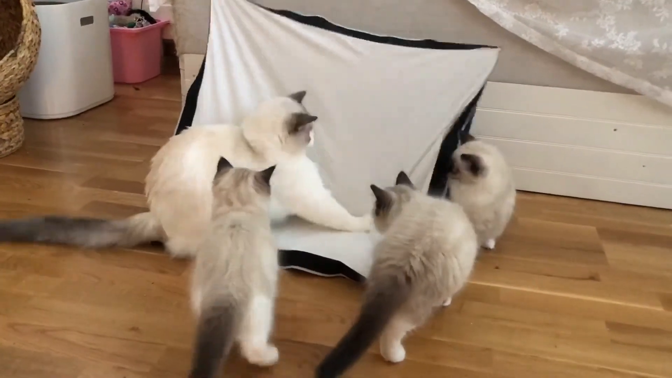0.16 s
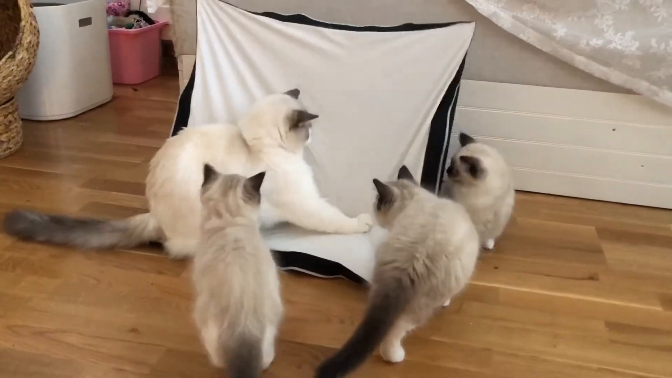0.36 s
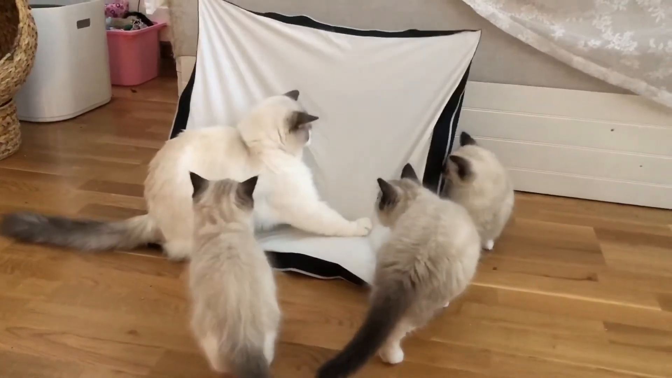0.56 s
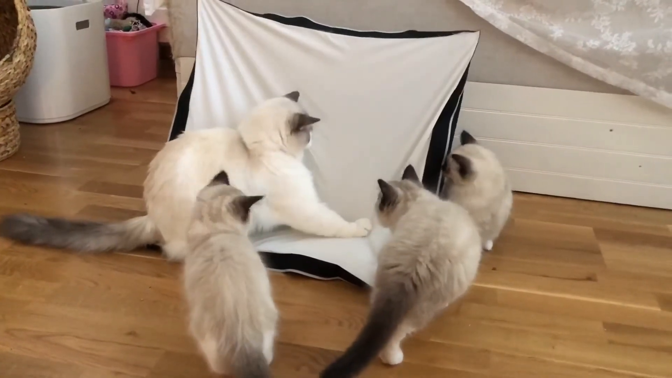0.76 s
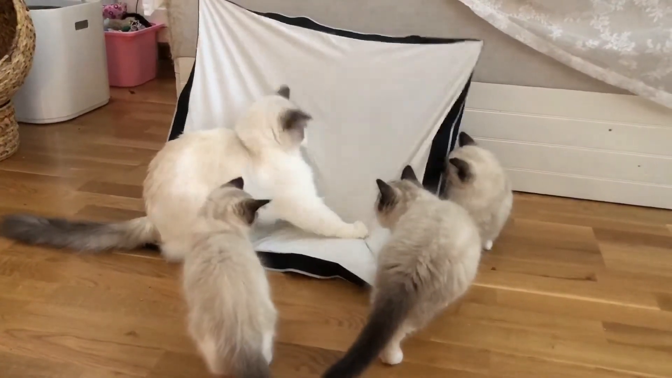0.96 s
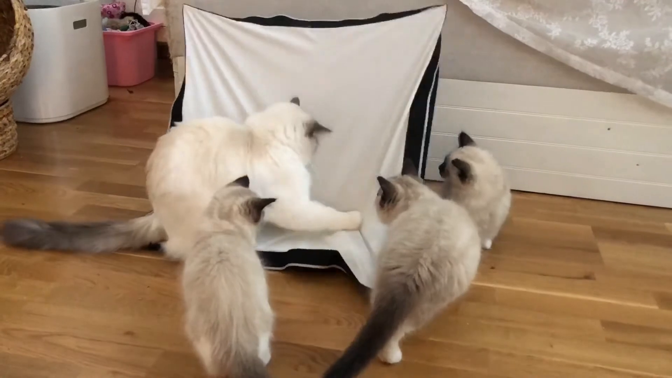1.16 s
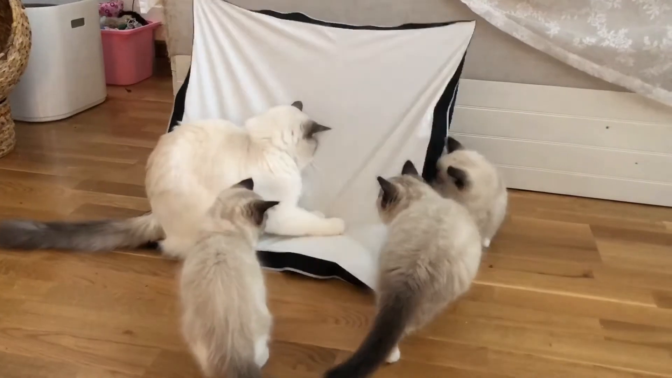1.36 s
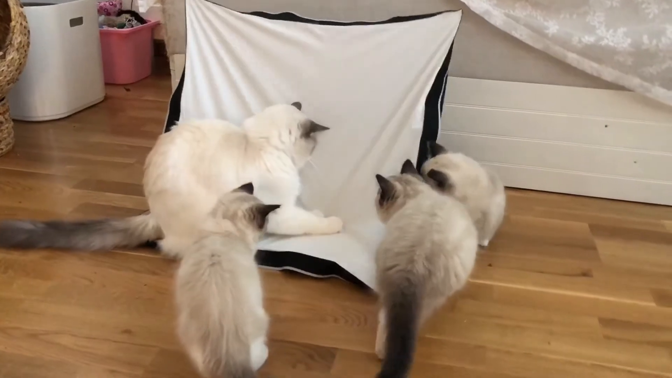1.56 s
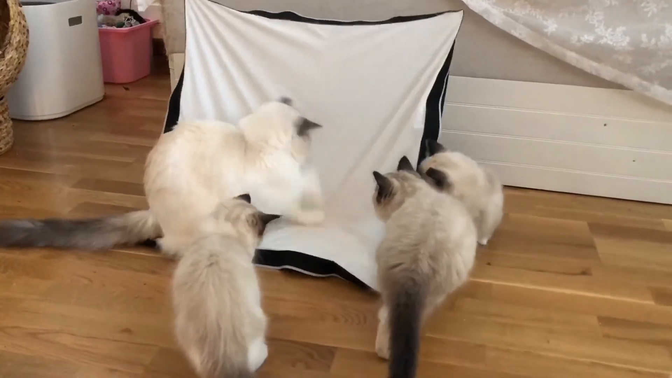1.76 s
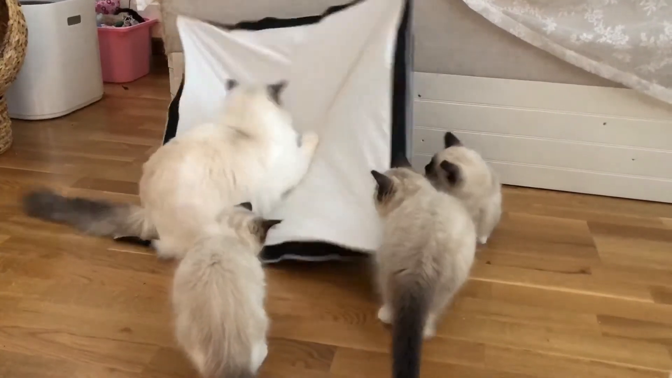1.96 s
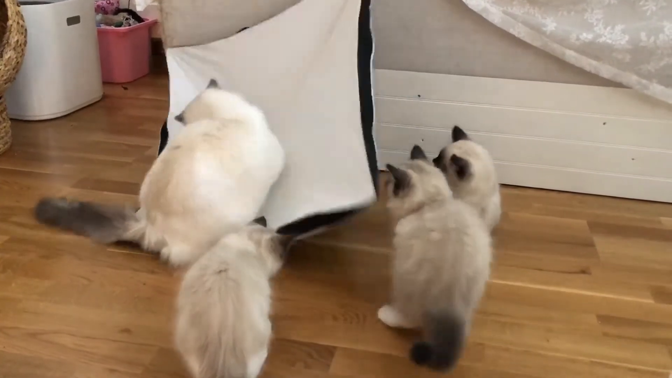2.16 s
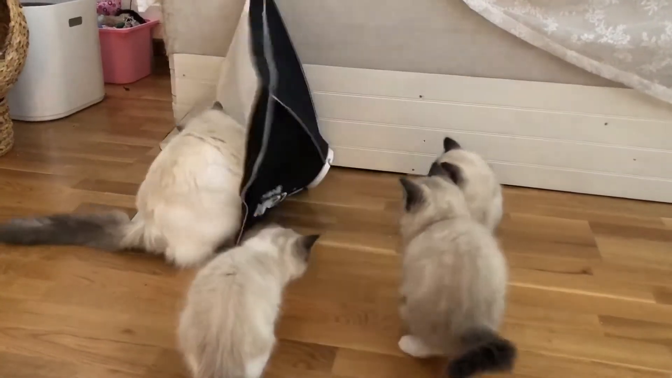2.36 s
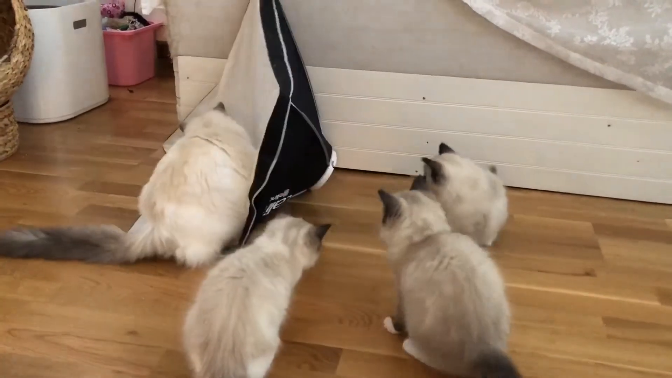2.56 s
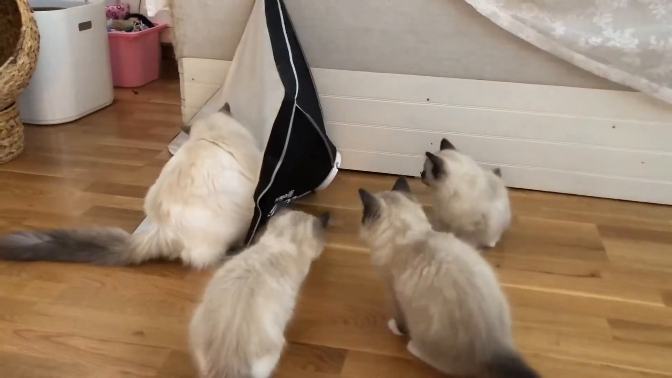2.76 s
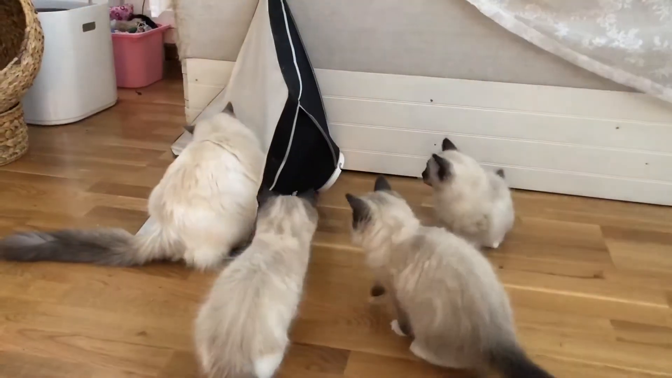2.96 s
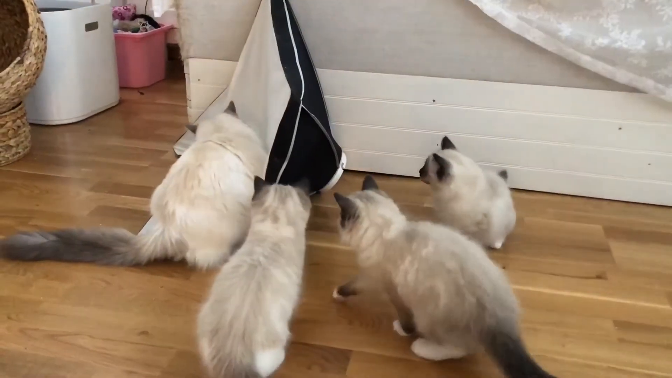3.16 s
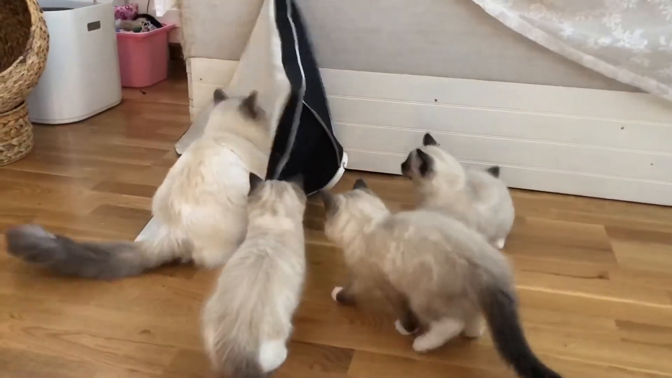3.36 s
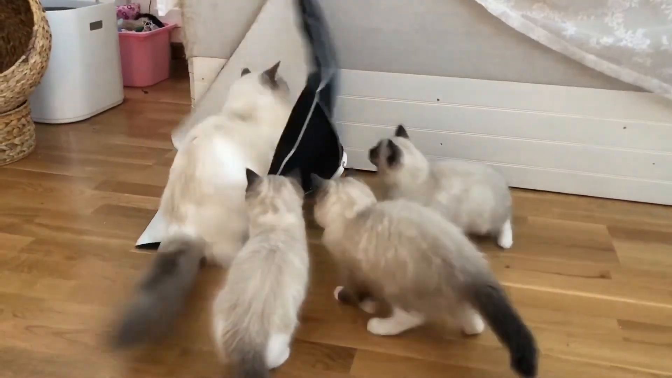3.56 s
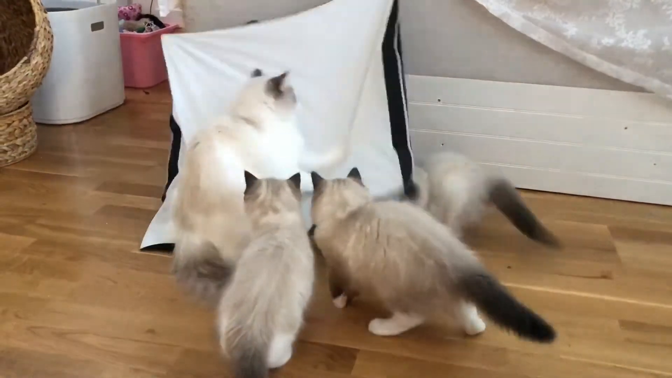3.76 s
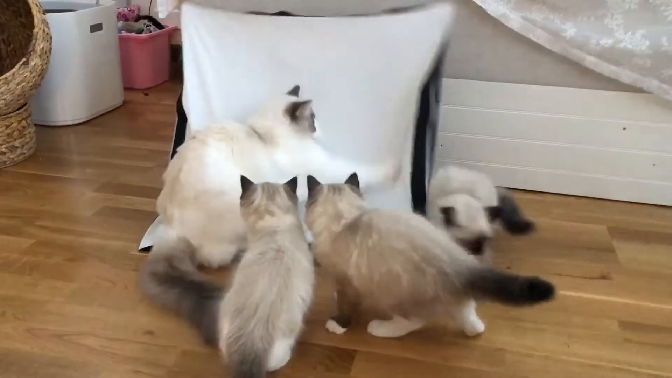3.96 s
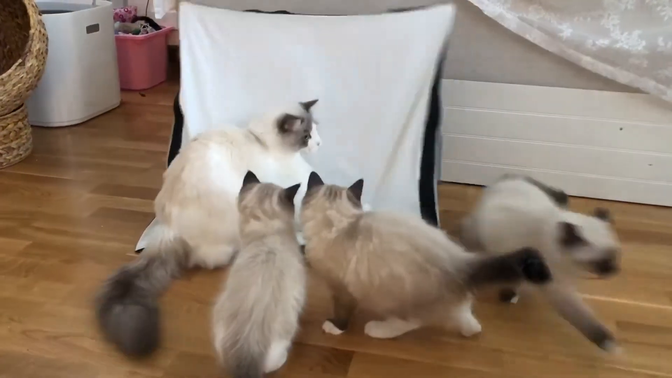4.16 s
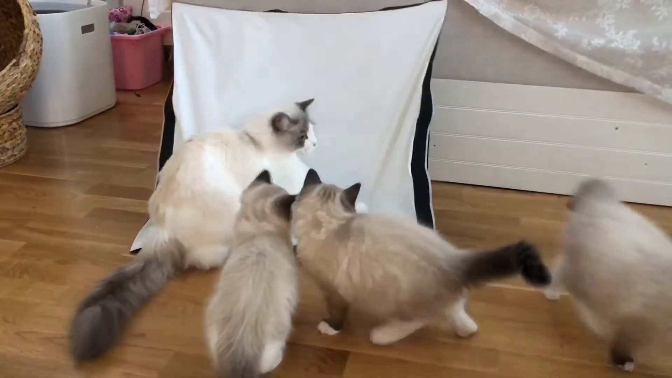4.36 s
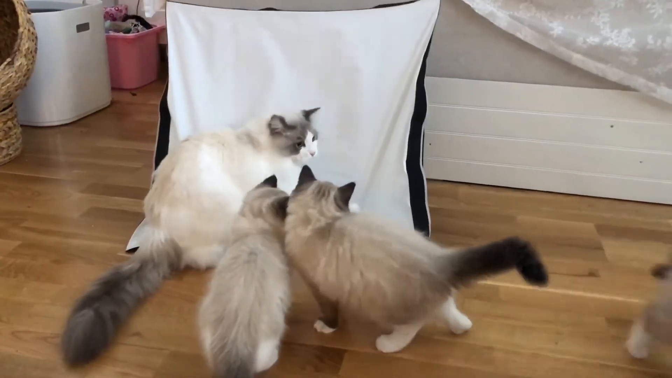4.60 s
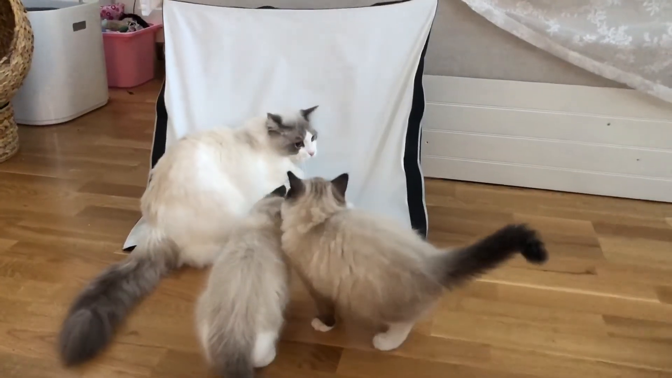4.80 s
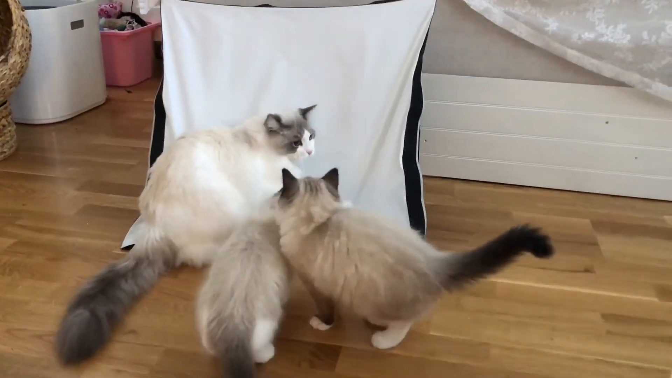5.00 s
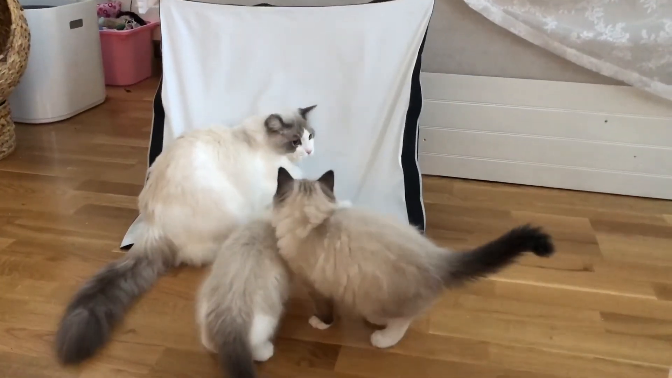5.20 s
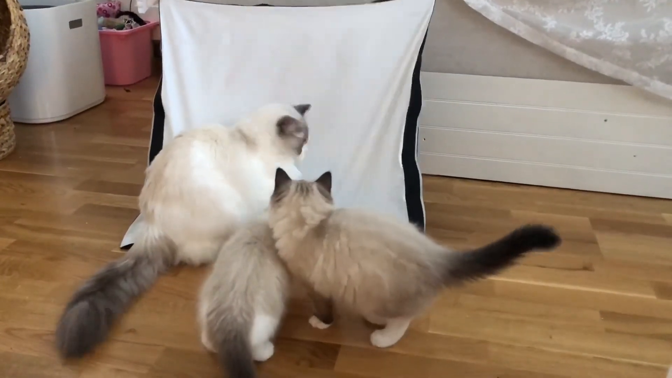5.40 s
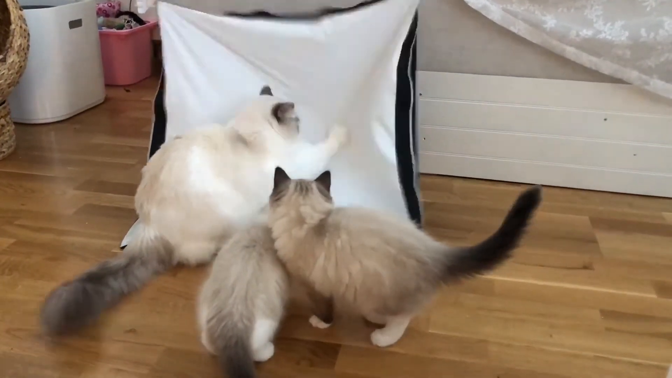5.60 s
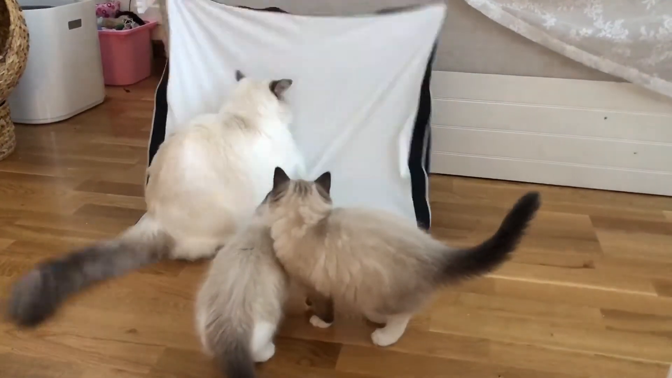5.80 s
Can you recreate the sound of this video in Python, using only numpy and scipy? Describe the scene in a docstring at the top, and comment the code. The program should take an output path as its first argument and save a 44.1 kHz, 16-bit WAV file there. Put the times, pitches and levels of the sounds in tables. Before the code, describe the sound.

Kittens pounce on a fabric sheet indoors, making bursts of rustling, soft thumps and claw snags over a faint low appliance hum.

```python
"""A low appliance hum in a small room, and almost at once the rustle of a fabric sheet that kittens pounce on.
The sheet is jerked about above a wooden floor: grains and tiny chirps make the cloth billow, crumple and slide.
Noise puffs are its flaps when pulled taut, and short bright noise bursts are claws snagging in it.
Gliding tones zip where a claw runs over the weave; swings of a few cycles are claws and paws on the boards.
One microphone feeds both channels."""
import sys
import numpy as np
from scipy import signal
from scipy.fft import rfft, irfft, next_fast_len
from scipy.io import wavfile
from scipy.ndimage import map_coordinates

SR = 44100
rng = np.random.default_rng(int(sys.argv[2]) if len(sys.argv) > 2 else 0)


def generate_wav(signal):
    """Clip the signal to [-1, 1] and save it as 16-bit WAV at the path in sys.argv[1]."""
    frames = np.transpose(np.atleast_2d(signal))
    scaled = np.clip(frames, -1, 1) * 32767
    pcm = np.round(scaled).astype(np.int16)
    wavfile.write(sys.argv[1], SR, pcm)


N = 257544
TIME = np.arange(N) / SR
CUTOFF_HZ = 15900   # nothing much is heard above this


def from_db(db):
    """Decibels to amplitude gain."""
    return 10 ** (np.asarray(db) / 20)


def rms_one(x):
    """Scale to rms 1."""
    return x / np.sqrt(np.mean(x ** 2) + 1e-20)


def at_hz(points, hz):
    """Read a table of (Hz, value) on a log-frequency axis."""
    table_hz, value = np.transpose(points)
    return np.interp(np.log(np.maximum(hz, 1)), np.log(table_hz), value)


def band(x, edges_hz, kind, order=2):
    """Butterworth filter, with its edges kept inside the usable range."""
    edges_hz = np.clip(edges_hz, 10, SR / 2 - 1000)
    sos = signal.butter(order, edges_hz, kind, fs=SR, output="sos")
    return signal.sosfilt(sos, x + 1e-18)


def coloured(x, spectrum):
    """Weight a signal's spectrum by a table of (Hz, dB); rms 1."""
    size = next_fast_len(len(x), True)
    weight = from_db(at_hz(spectrum, np.fft.rfftfreq(size, 1 / SR)))
    return rms_one(irfft(rfft(x, size) * weight, size)[:len(x)])


def drift(rate):
    """A smooth curve through this many random points per second; rms 1."""
    knots = rng.standard_normal(8000)
    return rms_one(map_coordinates(knots, [TIME * rate], order=3, mode="wrap"))


def burst(t60, rise):
    """A quarter-second envelope that rises and dies away; both times in seconds."""
    age = TIME[:SR // 4]
    return (1 - np.exp(-age / rise)) * np.exp(-np.log(1000) * age / t60)


def add(out, s, sound):
    """Lay a short sound into a track at time s."""
    start = int(np.clip(s * SR, 0, N - 1))
    out[start:start + len(sound)] += sound[:N - start]


# Colour of the still room. Each row: frequency in Hz, relative level in dB per Hz.
HUSH_SPECTRUM = [(15, -30), (25, -16), (66, -12.5), (102, -3), (126, -12), (157, -14), (299, -17.5),
                 (392, -24), (637, -28.5), (905, -26.5), (1360, -34.5), (1730, -36), (2810, -42),
                 (14600, -50.5), (15800, -57)]
# Appliance motor at the microphone. Each row: time in seconds, rms level in dB before it wavers.
MOTOR_LEVEL = [(0, -54), (0.9, -53), (1.7, -53.5), (3.1, -53), (4.1, -54.5), (4.6, -55.5), (5.84, -57.5)]
MOTOR_HZ, MOTOR_WAVER_HZ, MOTOR_WAVER_DB, MOTOR_WAVERS_PER_S = 59.7, 0.26, 0.5, 7
MAINS_HZ, MAINS_DB = 99.8, -56.5   # level is rms
HUSH_DB = -65   # rms of the part above 168 Hz


def background():
    """A wavering motor tone and a steady mains hum over the noisy hush of the room."""
    motor_hz = MOTOR_HZ + MOTOR_WAVER_HZ * drift(MOTOR_WAVERS_PER_S)
    motor_db = np.interp(TIME, *np.transpose(MOTOR_LEVEL)) + MOTOR_WAVER_DB * drift(MOTOR_WAVERS_PER_S)
    motor = from_db(motor_db) * np.sin(2 * np.pi * np.cumsum(motor_hz) / SR)
    mains = from_db(MAINS_DB) * np.sin(2 * np.pi * MAINS_HZ * TIME)
    hush = band(coloured(rng.standard_normal(N), HUSH_SPECTRUM), 28, "high")
    hush = hush / np.std(band(hush, 168, "high", order=4))
    return np.sqrt(2) * (motor + mains) + from_db(HUSH_DB) * hush   # root 2 turns rms into peak


# Low resonances of room and floor. Each row: frequency in Hz, width in Hz, level in dB beside the direct sound.
ROOM_MODES = [(165, 11, -12), (222, 28, -7), (354, 11, -12.5), (404, 34, -4), (522, 8.6, 3),
              (1134, 43, -21)]
# Reverberation of the room. Each row: frequency in Hz, time to fall by 60 dB in seconds.
ROOM_T60 = [(100, 0.11), (260, 0.62), (700, 0.32), (1840, 0.49), (4850, 0.31), (14000, 0.43)]


def room(x, wet_db):
    """A few low resonances, then diffuse reflections whose decay time depends on frequency."""
    modes = 0
    for hz, width, db in ROOM_MODES:
        modes = modes + from_db(db) * band(x, [hz - width / 2, hz + width / 2], "band", order=1)
    x = x + modes
    age = TIME[:SR]
    edges, tail = np.geomspace(60, 16000, 9), 0
    for low, high in zip(edges, edges[1:]):
        decay = np.exp(-np.log(1000) * age / at_hz(ROOM_T60, np.sqrt(low * high)))
        tail = tail + band(rng.standard_normal(SR), [low, high], "band") * decay
    tail = tail * np.minimum(age / 0.009, 1)   # reflections build up over 9 ms
    tail = tail / np.sqrt(np.sum(tail ** 2))
    return x + from_db(wet_db) * signal.fftconvolve(x, tail)[:N]


# Claws and paws on the boards, before the room is added.
# Each row: start in seconds, envelope peak in dB, pitch in Hz, cycles up to the peak.
TICKS = [(1.081, -16.5, 3050, 0.68), (1.118, -31, 3550, 0.62), (1.1945, -25.5, 2840, 0.42),
         (1.866, -34, 2630, 1.1), (1.936, -22.5, 1050, 1.3), (2.2254, -25.5, 2320, 0.66),
         (2.2754, -27, 2580, 1.2), (2.52, -27.5, 3000, 0.93), (3.449, -26.5, 600, 1.05),
         (3.4498, -22.5, 1800, 1.1), (3.469, -22, 1220, 0.32), (4.0414, -24, 1140, 0.94),
         (4.241, -36, 1810, 1.4), (4.365, -55, 1700, .8)]


def ticks():
    """A hard contact swings for only a few cycles: high for a claw tip, low for a knock."""
    out = np.zeros(N)
    for s, db, hz, cycles in TICKS:
        turns = TIME[:SR // 20] * hz
        swing = turns / cycles
        envelope = (swing * np.exp(1 - swing)) ** 2
        add(out, s, from_db(db) * envelope * np.sin(2 * np.pi * turns))
    return out


# Claw strokes over the weave. Each row: start in seconds, length in seconds, first pitch in Hz,
# pitch it settles towards in Hz, settling time in seconds, level in dB before the grip flutters,
# jitter as a share of the speed.
ZIPS = [(2.033, 0.051, 3100, 3320, 0.014, -45, .014), (2.088, 0.04, 3200, 3100, 0.009, -49, 0.018),
        (2.178, 0.034, 2500, 3360, 0.0064, -43.5, .017), (3.499, 0.12, 3400, 5600, 0.023, -52.5, 0.05),
        (3.619, 0.02, 2220, 2030, .006, -43, .012), (3.744, .08, 4400, 7530, 0.0039, -44.5, 0.022),
        (3.812, 0.1, 4970, 8690, 0.023, -43.5, 0.011), (4.015, 0.056, 3056, 5750, 0.021, -47, .07),
        (4.039, 0.065, 7800, 4630, .04, -46.5, 0.082), (5.363, .06, 2650, 1996, 0.041, -46.5, 0.08),
        (5.39, 0.095, 2040, 1880, .02, -49.5, 0.12), (5.467, .06, 1920, 2750, 0.019, -57.5, 0.063),
        (5.648, 0.086, 2062, 747, 0.021, -38.5, 0.2), (5.694, 0.055, 2700, 6050, 0.037, -48, 0.13),
        (5.779, .06, 5200, 9530, .055, -35.5, 0.13), (5.8, .012, 6150, 6840, 0.011, -30, .03)]
ZIP_ATTACK, ZIP_RELEASE = 0.12, 0.36   # shares of a stroke's length


def zips(flutter_db, overtone_db):
    """Each thread plucks the claw, so pitch follows the stroke's speed; a jerky stroke sounds hoarse."""
    out, uneven = np.zeros(N), drift(2500)
    for s, length, first_hz, last_hz, settle, db, jitter in ZIPS:
        inside = (TIME >= s) & (TIME < s + length)
        age = TIME[inside] - s
        hz = last_hz + (first_hz - last_hz) * np.exp(-age / settle)
        attack = np.minimum(age / length / ZIP_ATTACK, 1)
        release = np.minimum((1 - age / length) / ZIP_RELEASE, 1)
        phase = 2 * np.pi * np.cumsum(hz * (1 + jitter * uneven[inside])) / SR
        tone = np.sin(phase) + from_db(overtone_db) * np.sin(2 * phase)
        out[inside] += from_db(db) * attack * release * tone
    return out * from_db(flutter_db * drift(220))   # the claw's grip comes and goes


# Crisp snags of claws in the cloth. Each row: start in seconds, level in dB before the envelope,
# pitch around which the band lies in Hz, time to fall by 60 dB in seconds.
SNAGS = [(0.082, -49, 6840, 0.06), (0.361, -55, 8000, .015), (0.609, -58, 5500, .012),
         (1.021, -41, 8000, .01), (1.03, -36, 5500, .015), (1.304, -31, 7500, 0.015),
         (1.315, -40, 6040, 0.06), (1.840, -50, 7500, 0.096), (1.975, -28, 5800, 0.019),
         (2.355, -37, 5000, 0.031), (2.395, -31, 7040, 0.018), (3.470, -36, 6900, 0.0056),
         (3.624, -46, 7000, 0.053), (3.716, -36, 5970, 0.022), (3.902, -35, 4460, 0.13),
         (4.042, -37, 6000, .025), (4.255, -51, 8500, 0.016), (4.275, -48, 5000, 0.011),
         (5.612, -42.5, 9000, 0.024), (5.634, -32.5, 2400, 0.018)]


def snags():
    """A claw tears free of the fibres with a short bright crackle of spiky noise."""
    out = np.zeros(N)
    for s, db, hz, t60 in SNAGS:
        shape = burst(t60, rise=0.0009)
        fibres = band(rng.laplace(size=len(shape)), [hz / 1.9, hz * 1.4], "band")
        add(out, s, from_db(db) * shape * rms_one(fibres))
    return out


# Flaps and soft pounces. Each row: start in seconds, level in dB before the envelope, upper edge in Hz.
FLAPS = [(0.116, -35, 2280), (0.156, -36.5, 450), (0.375, -41.5, 2040), (0.997, -37.5, 2100),
         (1.316, -24.5, 3900), (1.324, -25, 600), (1.622, -52.5, 696), (1.930, -27.5, 1410),
         (1.976, -26, 2330), (2.387, -26.5, 2770), (2.425, -32, 377), (3.449, -26.5, 1900),
         (3.469, -29, 1610), (3.720, -24.5, 990), (3.917, -28, 1700), (4.040, -30, 1650),
         (4.239, -52, 2240), (4.363, -42.5, 1790), (4.861, -49.5, 500), (5.638, -34, 1700),
         (5.75, -29.5, 630)]
# Colour of the puff of air. Each row: frequency in Hz, relative level in dB per Hz.
FLAP_SPECTRUM = [(30, -46), (70, 1), (140, 4.5), (400, -1), (800, 0), (1400, -1.5), (4000, -6.5),
                 (15000, 7)]
FLAP_T60_S, FLAP_DARK_LASTS = 0.052, 0.27   # at an edge of 1 kHz; power law by which darker puffs last longer


def flaps():
    """Cloth pulled taut shoves the air in a dull puff; the darker it is, the longer it lasts."""
    out = np.zeros(N)
    for s, db, hz in FLAPS:
        khz = hz / 1000
        shape = burst(FLAP_T60_S / khz ** FLAP_DARK_LASTS, rise=0.0016)
        air = band(coloured(rng.standard_normal(len(shape)), FLAP_SPECTRUM), hz, "low", order=3)
        add(out, s, from_db(db) * shape * rms_one(air))
    return out


def grains(per_s, spread_db):
    """Random clicks of uneven size: fibres and small creases letting go; rms 1."""
    sizes = from_db(spread_db * np.minimum(rng.exponential(1, N), 4))
    happens = rng.random(N) < per_s / SR
    return rms_one(sizes * rng.standard_normal(N) * happens)


def friction(gain, per_s, spread_db, flutter_db, grainy_above_db):
    """Grains that come in clumps while the cloth moves hard, a smooth hush when it barely moves."""
    share = gain / (gain + from_db(grainy_above_db))
    clumps = rms_one(grains(per_s, spread_db) * from_db(flutter_db * drift(130)))
    return np.sqrt(share) * clumps + np.sqrt(1 - share) * rng.standard_normal(N)


def slips(low_hz, high_hz, length_s, glide, count):
    """Threads stick and slip in tiny gliding chirps, at random moments and pitches; rms 1."""
    when, pitch, slope, size = rng.random((count, 4)).T[:, :, None]
    age = TIME[:int(length_s * SR)]
    start_hz = low_hz + pitch * (min(high_hz, CUTOFF_HZ) - low_hz)
    hz = start_hz * (1 + glide * (2 * slope - 1) * age / length_s)
    chirps = size ** 2 * np.hanning(len(age)) * np.sin(2 * np.pi * np.cumsum(hz, axis=1) / SR)
    places = (when * N).astype(int) + np.arange(len(age))
    return rms_one(np.bincount(places.ravel(), chirps.ravel(), N)[:N])


# Pulls and slides of the cloth. Each row: start in seconds, attack in seconds, hold in seconds,
# level in dB before trims, trim of the whole sheet's billow in dB,
# brightness in dB (a trim of the weave and nap, scaled by each one's share).
TUGS = [(0.068, 0.07, 0.034, -50.5, 1.5, -6.5), (0.142, 0.024, 0.071, -47.5, 4, 1.5),
        (0.257, 0.018, 0.03, -52, -6, -9.5), (0.356, 0.014, 0.016, -54, 0, -26),
        (0.463, 0.023, 0.16, -80.5, 15.5, -1), (0.884, 0.036, 0.086, -68.5, -4, 6.5),
        (0.991, 0.027, 0.081, -48, -4.5, -4), (1.108, 0.031, 0.095, -51.5, -1, -14),
        (1.294, .02, 0.06, -43, -2, -20), (1.515, 0.017, 0.056, -71, 9, -12.5),
        (1.777, 0.05, 0.036, -68, 7, 5), (1.834, 0.12, 0.032, -37, -1.5, -17),
        (1.993, 0.04, 0.048, -50.5, -4, 5), (2.089, 0.046, 0.07, -49, -16, -1),
        (2.214, 0.028, 0.13, -44.5, 1, -12.5), (2.336, 0.073, 0.029, -37.5, -7.5, -11),
        (2.486, 0.028, 0.044, -52.5, 2, -13.5), (3.282, 0.089, 0.056, -64.5, 1, 1.5),
        (3.403, 0.033, 0.062, -42, 1.5, -8.5), (3.495, 0.04, 0.12, -52.5, -9, 2),
        (3.605, 0.057, 0.068, -41.5, 1.5, -15), (3.691, 0.052, 0.078, -42, -2, -2),
        (3.832, 0.055, 0.055, -46.5, 1.5, 0), (3.953, 0.029, 0.061, -42.5, 1.5, -12.5),
        (4.016, .015, 0.046, -46, 1.5, -6.5), (4.077, 0.023, 0.044, -42.5, -2.5, -14),
        (4.208, 0.033, 0.028, -52.5, -3, -14.5), (4.325, 0.031, 0.048, -59.5, 6, -26),
        (4.437, 0.027, .02, -68, 5, -10), (4.506, 0.023, 0.19, -65, -0.5, -5),
        (5.325, 0.039, 0.16, -57.5, -8.5, -1.5), (5.568, 0.071, .02, -52.5, 0, -5),
        (5.624, 0.028, 0.093, -40, 1.5, -19.5), (5.676, 0.044, 0.084, -46, 4, 6.5)]


def tug_gain(trims_db, release_db_per_s):
    """Every tug swells, holds and dies away; tugs that overlap add in power."""
    power = 0
    for (s, attack, hold, db, _, _), trim_db in zip(TUGS, trims_db):
        swell = np.clip((TIME - s) / attack, 0, 1)
        released = np.maximum(TIME - s - attack - hold, 0)
        power = power + (swell * from_db(db + trim_db - release_db_per_s * released)) ** 2
    return np.sqrt(power)


# Four scales of the cloth: billowing sheet, crumpling creases, rasping weave, hissing nap.
# Each row: lower edge in Hz, upper edge in Hz, grains per second, size spread in dB, clumping in dB,
# level of the slips beside the grit in dB before pressure, gain in dB, share of the tug's brightness,
# release in dB per second.
TEXTURES = [(61, 536, 900, 1, -0.8, -4, -3, 0, 117), (552.6, 2080, 1300, 1, 1, -2, -0.87, 0, 160),
            (2115, 6000, 4500, 0, 1.5, -3.5, 0, 0.52, 169),
            (5930, 16200, 12000, 0.5, 2.5, -8.5, -1.1, 0.78, 224)]
# Colour of the rustle. Each row: frequency in Hz, relative level in dB per Hz.
CLOTH_SPECTRUM = [(41, -45), (70, 4), (80, -20), (103, -4), (126, -0.5), (181, -0.5), (313, 0), (410, -2),
                  (551, -8.5), (1190, -9), (2690, -13), (3310, -11.5), (4240, -13.5), (11500, -24.5),
                  (15800, -28.5)]


def rustle():
    """Each scale of the cloth, from sheet to nap, sounds in a range of its own; the finest stop first."""
    out = 0
    *_, billow_db, bright_db = np.transpose(TUGS)
    for k, texture in enumerate(TEXTURES):
        low, high, per_s, spread_db, flutter_db, slip_db, gain_db, bright_share, release = texture
        trims_db = billow_db if k == 0 else bright_share * bright_db
        gain = tug_gain(trims_db, release)
        grit = friction(gain, per_s, spread_db, flutter_db, grainy_above_db=-47.0)
        grit = rms_one(band(grit, [low, high], "band", order=3))
        pressed = np.sqrt(gain / (gain + from_db(-67)))   # threads only catch under some pressure
        chirps = slips(low, high, length_s=0.016, glide=0.108, count=1800)
        squeaks = pressed * from_db(slip_db) * chirps
        out = out + from_db(gain_db) * gain * coloured(grit + squeaks, CLOTH_SPECTRUM)
    return out


def scene():
    """Cloth, blows and claws in the room, with the background, at one microphone."""
    cloth = room(rustle(), wet_db=-13.5)
    blows = room(flaps() + snags(), wet_db=-7.0)
    claws = room(ticks() + zips(flutter_db=3.5, overtone_db=-16), wet_db=-7)
    return np.tile(cloth + blows + claws + background(), (2, 1))


def record(dry):
    """A steep elliptic low-pass cuts the top."""
    return signal.sosfilt(signal.ellip(12, 0.1, 80, CUTOFF_HZ, fs=SR, output="sos"), dry)


dry = scene()
out = record(dry)
generate_wav(out)
```